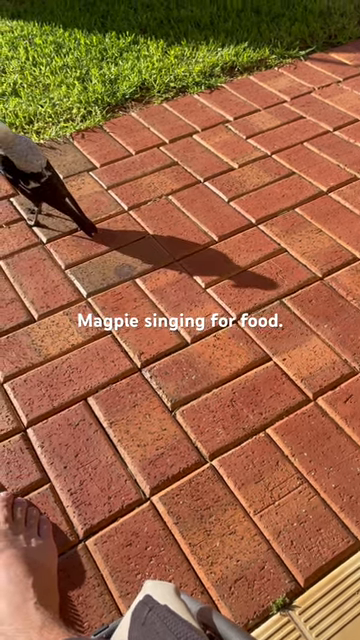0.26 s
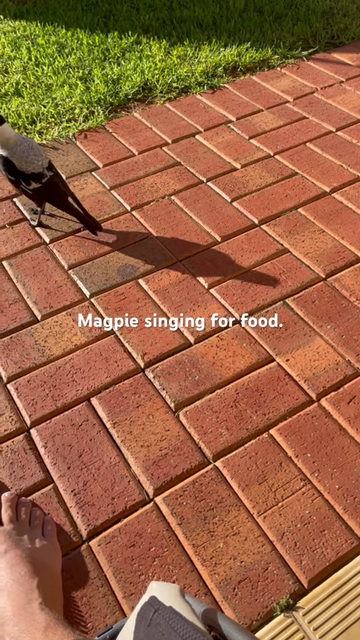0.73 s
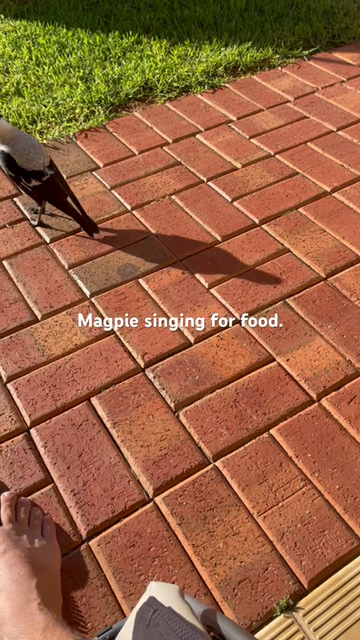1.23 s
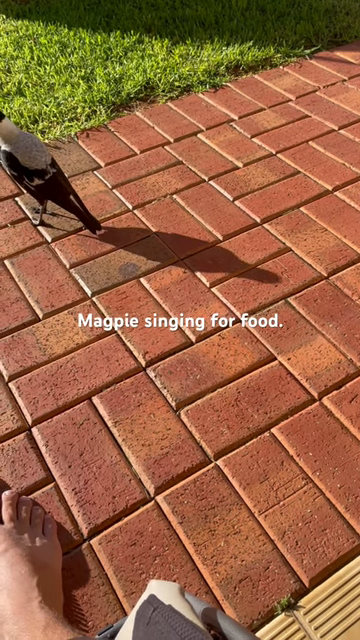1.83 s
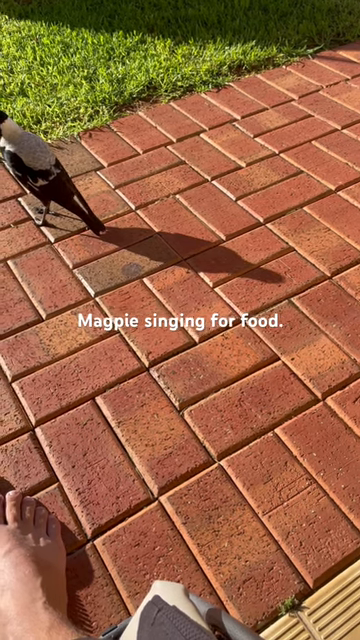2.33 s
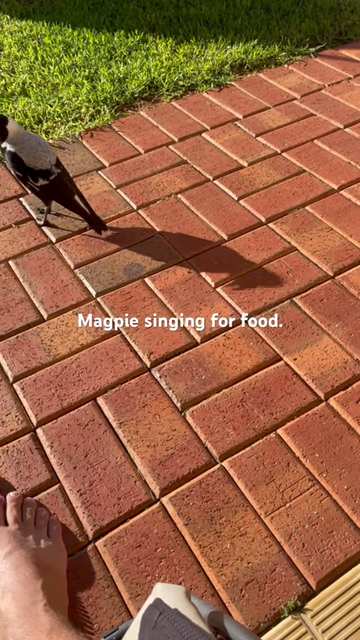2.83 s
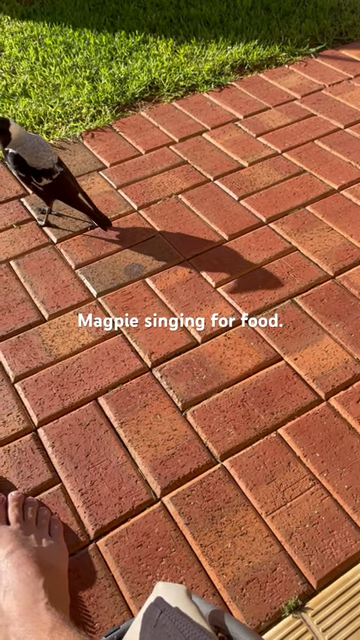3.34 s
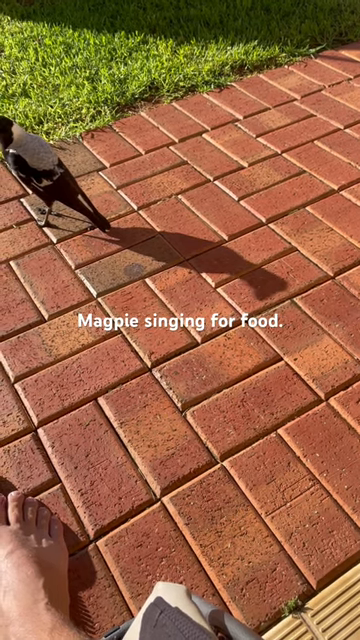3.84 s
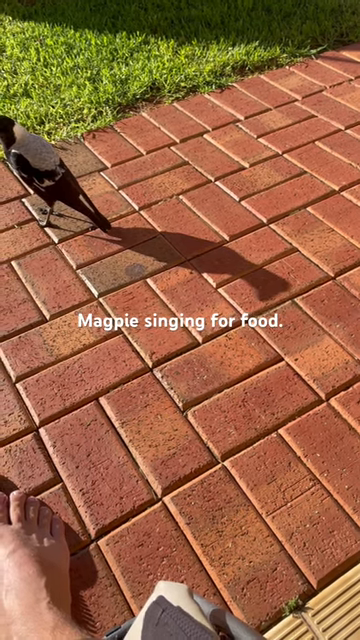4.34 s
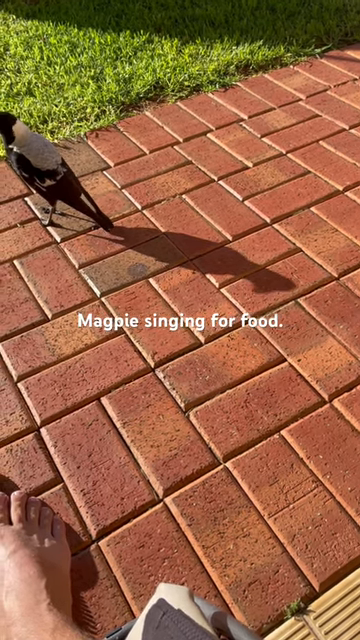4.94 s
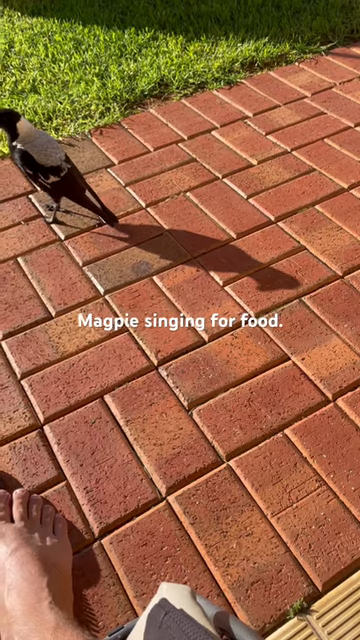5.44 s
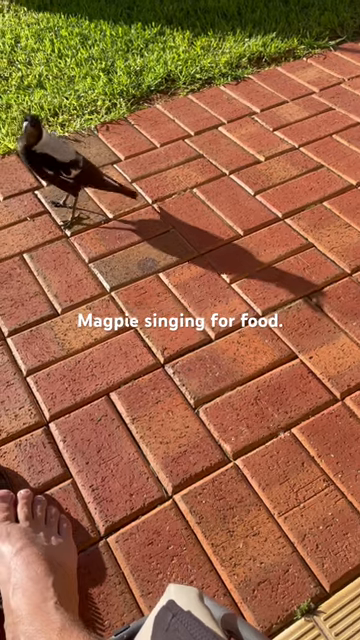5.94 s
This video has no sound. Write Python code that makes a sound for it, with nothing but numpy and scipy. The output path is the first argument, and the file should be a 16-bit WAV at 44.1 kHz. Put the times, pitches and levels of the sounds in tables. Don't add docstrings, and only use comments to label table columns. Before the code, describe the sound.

Outdoors on a paved yard, a magpie near a handheld phone opens with quick fluted notes and throbbing warbles, pauses for small squeaks and soft knocks on the phone, gives a brief harsh rising call, then sings a longer run of clear whistles and warbles that fades out. A faint motor hum, distant traffic and slight cloth rustle lie beneath, with short echoes from walls.

```python
import sys
import numpy as np
from scipy import signal
from scipy.fft import rfft, irfft, next_fast_len
from scipy.io import wavfile
from scipy.ndimage import uniform_filter1d, map_coordinates

SR = 44100
rng = np.random.default_rng(int(sys.argv[2]) if len(sys.argv) > 2 else 0)


def dump(signal):
    limited = np.clip(np.atleast_2d(signal).T, -1, 1)
    pcm = np.round(limited * 32767).astype(np.int16)
    wavfile.write(sys.argv[1], SR, pcm)


def to_linear_factor(level_db):
    exponent = np.asarray(level_db, float) / 20
    return 10 ** exponent


N = 272538

# t/s, level/dB
TRAFFIC = [(0.0, -60.5), (0.4, -63.5), (6.18, -68.5)]
# f/Hz, level per Hz/dB
MURMUR = [(20, -33.5), (45, 0.5), (82, -2), (125, -10), (400, -19), (950, -22), (1700, -30.5), (2900, -43),
          (6000, -56.5), (15500, -56.5)]
# f/Hz, likeness/0-1
ALIKE = [(60, 0.99), (150, 1), (400, 0.14), (6000, 0.2)]
# start t/s, length/s, peak level/dB
RUSTLE = [
    (-.1, 0.49, -82.5),
    (.8, 0.21, -86.5),
    (1.3, 0.48, -76.5),
    (1.78, .14, -77),
    (1.92, 0.47, -71),
    (2.76, 0.6, -75),
    (5.93, 0.5, -99.5),
]
# share of its length/0-1, level/dB
RUSTLE_SHAPE = [(0, -15.5), (.28, -0.5), (.6, -2), (1, -22.5)]
STILL_DB = -98.5
# f/Hz, level per Hz/dB
CLOTH = [(500, -11), (1200, -2.5), (2800, 0.5), (4300, 2.5), (5500, 3.5), (6500, -4), (9000, -11.5),
         (13000, -18), (15500, -11.5)]
# t/s, shaft f/Hz, shaft level/dB, second order level/dB, mains level/dB
MOTOR = [(0, 83.37, -51.5, -55.5, -60), (2, 82.82, -58.5, -62, -61), (4, 82.17, -61.5, -66, -58.5),
         (6.18, 82.07, -62.5, -65, -60)]
# t/s, firing f/Hz, level/dB
ENGINE = [(2, 42.11, -88), (3.2, 50, -62), (4, 60, -60.5), (5, 64, -54), (5.6, 69.05, -64),
          (6.18, 79.4, -60)]

# f/Hz, level/dB
THROAT = [(1200, 21), (1800, -6), (2600, -8), (3100, -13), (3700, -10), (4800, -16.5), (6000, -32.5),
          (9000, -40.5), (12000, -39), (14000, -39.5)]
# start t/s, length/s, first f/Hz, last f/Hz, peak level/dB
SWELLS = [(.05, .07, 914, 1020, -48), (.34, .046, 800, 1127, -41.5), (1.153, 0.028, 874, 1240, -24.5),
          (1.35, .04, 720, 844, -36), (3.0, .05, 1330, 1290, -25), (3.04, .028, 1250, 1130, -30),
          (3.33, .022, 886, 1484, -35), (3.712, 0.047, 1380, 1409, -28.5), (3.97, .03, 978, 798, -33.5),
          (4.115, .02, 1162, 1339, -34), (4.66, .044, 1164, 1202, -21), (4.935, .055, 787, 806, -39.5),
          (5.472, .018, 1148, 1302, -37.5)]
# start t/s, length/s, first f/Hz, last f/Hz, peak level/dB
HELD = [(0, 0.043, 856, 889, -37.5), (.172, .043, 1205, 1119, -40), (.93, 0.023, 1249, 1321, -23),
        (1.17, 0.099, 937.6, 1045, -27), (1.185, 0.07, 1208, 1116, -22.5), (1.27, 0.046, 971, 1102, -35.5),
        (1.54, 0.024, 3580, 3190, -55), (3.445, 0.038, 1044, 1203, -47.5), (4.83, .085, 778, 798, -40.5)]
# start t/s, length/s, first f/Hz, last f/Hz, peak level/dB
FLUTES = [(3.04, .085, 1048, 1033, -25), (5.022, .075, 1377, 1414, -33)]
# start t/s, length/s, first f/Hz, last f/Hz, peak
# level/dB
BUILDS = [(3.348, .154, 1432, 1358, -24), (3.76, .088, 1007, 1006, -23.5), (4.325, .07, 995, 1035, -25.5),
          (5.088, 0.056, 1425, 1277, -30)]
# start t/s, length/s, first f/Hz, last f/Hz, peak level/dB
FADES = [(.214, 0.029, 956, 894, -36), (3.68, 0.037, 1232, 1417, -17), (3.842, .102, 1010, 984, -33.5),
         (4.7, 0.022, 1361, 1374, -32.5)]
# start t/s, length/s, edge f/Hz, middle f/Hz, peak level/dB
ARCHES = [(.703, .045, 1260, 1325, -28), (4.138, .04, 1500, 2780, -51), (3.8, .09, 830, 1220, -49),
          (4.995, .03, 1300, 942, -29), (5.44, .034, 1300, 1715, -47)]

# start t/s, length/s, f/Hz, peak level/dB, throb rate/Hz
RISING = [(4.185, .14, 929.7, -25, 92)]
EVEN = [(1.305, .185, 750, -42.5, 87.4), (4.825, .055, 934.7, -20.5, 123.2)]
ROLLING = [(5.138, .222, 940, -29, 59.42)]
OPENING = [(0, .175, 1195, -27.5, 140)]
QUAVERS = [(.89, .04, 1179, -21, 77.8), (5.36, .082, 1250, -25, 98.9)]
BURBLE = [(.735, .16, 897, -32.5, 60.8)]
SINKING = [(.235, 0.12, 885, -42.5, 70), (.38, 0.078, 1049, -38.5, 69), (.935, .065, 984, -24, 48),
           (1.0, 0.13, 860.4, -40, 76), (4.0, .115, 880, -41, 92), (4.4, .075, 1086, -26, 44),
           (4.7, .06, 985, -25, 54), (5.49, 0.1, 956, -35, 47.5)]
MUTTERS = [(.45, .11, 962, -58.5, 81), (4.475, 0.093, 960, -45, 86.2), (4.76, 0.053, 879, -42.5, 81.1),
           (5.6, .16, 792, -55, 57.8)]

# share of its length/0-1, level against the peak/dB
SWELL_SHAPE = [(0, -15), (.35, -6.5), (.75, 1.5), (1.002, -8)]
HELD_SHAPE = [(0, -3), (.2, -0.5), (.8, -2), (1, -10)]
FLUTE_SHAPE = [(0, -2), (0.251, -2), (.88, -1), (0.998, -8.5)]
BUILD_SHAPE = [(0, -14), (.25, -6), (.5, -2), (0.851, 0), (1, -7)]
FADE_SHAPE = [(0, -3), (.2, -0.5), (0.502, -3), (1, -18)]
RISING_SHAPE = [(0, -10.5), (.5, -3.5), (.8, -1), (1, -3)]
EVEN_SHAPE = [(0, -12), (.35, -1.5), (.7, -0.5), (1, -9)]
ROLLING_SHAPE = [(0, -12), (.35, -0.5), (.8, -0.5), (1, -8)]
SINKING_SHAPE = [(0, -0.5), (0.152, 0), (0.499, -5.5), (1, -10)]

# t/s, f/Hz, level/dB
SQUEAKS = [
    [(0.665, 492, -68.5), (0.675, 519.5, -78), (0.681, 804, -60), (0.699, 1282, -72.5)],
    [(1.82, 1904, -66.5), (1.838, 2034, -42), (1.854, 2134, -44.5), (1.88, 3386, -81)],
    [(2.275, 756, -60), (2.325, 1030, -50.5), (2.34, 1241, -44.5), (2.355, 1187, -47), (2.395, 1320, -48),
     (2.409, 1500, -66)],
    [(2.5, 1286, -47.5), (2.518, 1165, -43), (2.535, 1346, -50.5), (2.558, 2798, -46), (2.57, 2510, -61),
     (2.574, 1787, -46.5), (2.594, 915, -51)],
    [(2.635, 1153, -66), (2.653, 1343, -47.5), (2.661, 1271, -45.5), (2.675, 936, -51)],
    [(4.135, 654, -66.5), (4.151, 1248, -37), (4.159, 1372, -33.5), (4.173, 1177, -36.5),
     (4.185, 1008, -56.5)],
]
SQUEAK_OVER = [8, -22.5, 0.5, 3, -12, -26.5]
# t/s, f/Hz, level/dB
HARSH = [(2.77, 1398, -55), (2.79, 1879, -44), (2.814, 2207, -41), (2.912, 2098, -40.5),
         (2.94, 1937, -36.5)]
# t/s, f/Hz, level/dB
HARSH_END = [(2.94, 1865, -42), (2.974, 1701, -43.5), (3.0, 1796, -45)]
# t/s, f/Hz, level/dB
BUZZ = [(3.5, 1230, -33.5), (3.6, 1161, -37.5), (3.65, 1106, -32.5), (3.685, 1186, -26.5)]
# t/s, f/Hz, level/dB
UNDER = [(2.775, 1000, -80), (2.81, 1240, -72), (2.88, 1270, -71), (2.925, 1350, -71), (2.94, 1270, -67),
         (2.975, 1050, -78)]

RISING_THROB, EVEN_THROB, SINKING_THROB = (0.36, .075, 1.2), (0.086, .08, 1.8), (.25, .08, 1.7)
MUTTER_THROB, ROLLING_THROB, QUAVER_THROB = (0.47, 0.21, -2.3), (0.37, .09, 1.2), (0.094, .015, -2.2)
# reference time that sets the throbs' phase t/s, rate/Hz, depth, pitch swing, swing
HARSH_THROB, END_THROB = (2, 89.5, .28, .09, -1.5), (4, 56, 1, -0.05, -6.5)
BUZZ_THROB, UNDER_THROB = (3.5087, 87, .5, 0.07, -2.5), (2.7785, 89.5, .4, .025, -2)
STEADY = (0, 0, 0, 0, 0)
THROB_DELAY_S = .006
PITCH_PER_DB, SAG_PER_DB = .008, .014
OVER_DB, WARBLE_OVER_DB, QUAVER_OVER_DB, MUTTER_OVER_DB = -27.5, -30.5, -34, -10.5
HARSH_OVER_DB, END_OVER_DB, BUZZ_OVER_DB, UNDER_OVER_DB = -12, -0.5, -27, 29
OVER_PER_DB, WARBLE_OVER_PER_DB, OVER_PER_S = 0.69, 0.98, -49.5
ROUGH = dict(flute=.16, quaver=.27, rising=.45, even=.33, rolling=.38, sinking=.45, mutter=.55, harsh=.5)

# f/Hz, time to fall 60 dB/s
YARD = [(300, 1), (1000, 0.46), (2500, 0.63), (6000, 0.42)]
# f/Hz, left minus right level/dB, left lead/rad
PORTS = [(1400, 0.2, -0.19), (2220, 0, 1.1), (3020, -6.5, 1.8), (3400, -0.5, 2.3), (5260, -1.5, -0.16)]
# t/s, peak level/dB, f/Hz
BUMPS = [
    (0.035, -47, 365),
    (0.656, -52.5, 458),
    (1.452, -54, 242),
    (1.672, -49.5, 444),
    (1.807, -52, 406),
    (2.047, -43, 382),
    (2.092, -48, 378.3),
    (2.495, -48.5, 600),
    (3.357, -59.5, 248),
]
# t/s, peak level/dB, body level/dB
TICKS = [
    (.668, -65, 12.5),
    (1.808, -63, 8.5),
    (2.4998, -59, 35),
    (5.884, -65.5, -7),
    (6.128, -67, 11.5),
]
# low f/Hz, high f/Hz
HOLES = [(6750, 8350), (13100, 15050)]


def unit(x):
    return x / np.sqrt(np.mean(x ** 2) + 1e-20)


def along(points, hz):
    f, value = np.transpose(points)
    return np.interp(np.log(hz + 1), np.log(f + 1), value)


def curves(rows, t):
    s, *columns = np.transpose(rows)
    return [np.interp(t, s, column) for column in columns]


def wobble(rate, count):
    return map_coordinates(rng.standard_normal(count // 40 + 9), [np.arange(count) * rate / SR])


def filtered(x, response):
    m = next_fast_len(N + 8192)
    return irfft(rfft(x, m) * response(np.fft.rfftfreq(m, 1 / SR)), m)[..., :N]


def add(track, s, x):
    part = track[..., max(round(s * SR), 0):][..., :x.shape[-1]]
    part += x[..., :part.shape[-1]]


def rush(spectrum, alike):
    def shape(hz):
        turn = np.arccos(np.clip(along(alike, hz), -1, 1)) / 2
        return to_linear_factor(along(spectrum, hz)) * [np.cos(turn), np.sin(turn)]

    mid, side = filtered(rng.standard_normal((2, N)), shape)
    return unit(np.array([mid + side, mid - side]))


def background():
    t = np.arange(N) / SR
    traffic_db = curves(TRAFFIC, t)[0] + 7 + 2.4 * wobble(9.9, count=N)
    traffic = to_linear_factor(traffic_db) * rush(MURMUR, ALIKE)
    grain = unit(to_linear_factor(1.2 * wobble(300, count=N) + 1.2 * wobble(25, count=N)))
    strength = to_linear_factor(STILL_DB)
    for s, length, db in RUSTLE:
        moving = abs(t - s - length / 2) < length / 2
        strength = strength + to_linear_factor(db + curves(RUSTLE_SHAPE, (t - s) / length)[0]) * moving
    hiss = rush(CLOTH, [(1000, 1.0), (3000, 0.15), (12000, 0.15)])
    return traffic + to_linear_factor(14) * strength * grain * hiss


def hum():
    t = np.arange(N) / SR
    shaft, first_db, second_db, mains_db = curves(MOTOR, t)
    firing, engine_db = curves(ENGINE, t)

    def tone(hz, db, drift):
        level = to_linear_factor(db + 0.5 + drift * wobble(14, count=N))
        return level * np.sin(2 * np.pi * np.cumsum(hz) / SR + 0.2 * drift * wobble(8.3, count=N))

    motor = tone(shaft, first_db, drift=1.2) + tone(2 * shaft, second_db, drift=0.39)
    mains = tone(50.5 + 0 * t, mains_db, drift=1.5)
    return motor + mains + tone(firing, engine_db, drift=1.6)


def phrase(s, length, db, shape, pitch):
    u = np.linspace(0, 1, num=17)
    effort, = curves(shape, u)
    return np.transpose([s + length * u, pitch(u, effort), db + effort])


def choke(tone):
    loud = tone / .1
    return to_linear_factor(-58) * loud ** 2 + to_linear_factor(-49) * loud ** 3 + to_linear_factor(-53) * loud ** 4


def note(rows, voice, throb):
    t = np.arange(rows[0][0], rows[-1][0], 1 / SR)
    pitch, level = curves([(s, hz, to_linear_factor(db)) for s, hz, db in rows], t)
    over_db, rough = voice
    first, rate, depth, swing, lead = throb

    def shake(speed):
        return wobble(speed, count=len(t))

    turn = 2 * np.pi * rate * (t - first) + 1.4 * rough * shake(35)
    spike = np.exp(1.6 * (np.cos(turn + lead) - 1)) - .25
    pitch = pitch * (1 + 2.72 * swing * spike + 0.085 * rough * shake(300))
    pulse = unit(to_linear_factor(11 * depth * np.cos(turn) + 4 * rough * shake(160)))
    phase = 2 * np.pi * np.cumsum(pitch) / SR
    k = np.arange(2, 13)[:, None]
    flicker = to_linear_factor((0.5 + 9.5 * rough) * np.array([shake(215.1) for _ in k]))
    share = to_linear_factor(along(THROAT, k * pitch)) * (k * pitch < SR / 3) * flicker
    to_edge = np.minimum(t - t[0], t[-1] - t)
    edge = np.sin(np.pi / 2 * np.clip(to_edge / .0055, 0, 1)) ** 2
    swell = np.sqrt(2) * level * edge * pulse
    bright = to_linear_factor(over_db) * (level / level.max()) ** 0.2
    bright = bright * to_linear_factor(-18 * np.clip(swing, 0, .3) ** .5 * spike)
    tone = np.sin(phase) + bright * np.sum(share * np.sin(k * phase), 0)
    air = bright * (0.35 + 0.9 * rough) * rng.standard_normal(len(t))
    return swell * np.array([tone, air])


def magpie():
    song = np.zeros((3, N))

    def sing(rows, over_db, kind, throb):
        tone, air = note(rows, (over_db, ROUGH[kind]), throb)
        add(song, rows[0][0], np.array([tone, air, choke(tone)]))

    def line(u):
        return u

    def bow(u):
        return np.sin(np.pi * u)

    clear = [(SWELLS, SWELL_SHAPE, line), (HELD, HELD_SHAPE, line), (FLUTES, FLUTE_SHAPE, line),
             (BUILDS, BUILD_SHAPE, line), (FADES, FADE_SHAPE, line), (ARCHES, HELD_SHAPE, bow)]
    for notes, shape, bend in clear:
        for s, length, a, b, db in notes:
            rows = phrase(s, length, db, shape, lambda u, _: a + (b - a) * bend(u))
            over_db = OVER_DB + OVER_PER_DB * (db + 28) + OVER_PER_S * length
            sing(rows, over_db, "flute", STEADY)

    warbles = [(RISING, RISING_SHAPE, RISING_THROB, WARBLE_OVER_DB, "rising"),
               (EVEN, EVEN_SHAPE, EVEN_THROB, WARBLE_OVER_DB, "even"),
               (ROLLING, ROLLING_SHAPE, ROLLING_THROB, WARBLE_OVER_DB, "rolling"),
               (OPENING, FLUTE_SHAPE, QUAVER_THROB, QUAVER_OVER_DB, "quaver"),
               (QUAVERS, BUILD_SHAPE, QUAVER_THROB, QUAVER_OVER_DB, "quaver"),
               (BURBLE, HELD_SHAPE, ROLLING_THROB, WARBLE_OVER_DB, "rolling"),
               (SINKING, SINKING_SHAPE, SINKING_THROB, WARBLE_OVER_DB, "sinking"),
               (MUTTERS, SINKING_SHAPE, MUTTER_THROB, MUTTER_OVER_DB, "mutter")]
    for notes, shape, throb, over_db, kind in warbles:
        follow = SAG_PER_DB if kind == "sinking" else PITCH_PER_DB
        for s, length, hz, db, rate in notes:
            rows = phrase(s, length, db, shape, lambda u, effort: hz * (1 + follow * effort))
            richness_db = over_db + WARBLE_OVER_PER_DB * (db + 29.5)
            sing(rows, richness_db, kind, (s + THROB_DELAY_S, rate, *throb))

    for rows, over_db in zip(SQUEAKS, SQUEAK_OVER):
        sing(rows, over_db, "flute", STEADY)
    sing(HARSH, HARSH_OVER_DB, "harsh", HARSH_THROB)
    sing(HARSH_END, END_OVER_DB, "harsh", END_THROB)
    sing(BUZZ, BUZZ_OVER_DB, "rising", BUZZ_THROB)
    sing(UNDER, UNDER_OVER_DB, "flute", UNDER_THROB)

    tone, air, own = song
    mixed = choke(tone) - 0.6 * own
    return tone + filtered(air + mixed, lambda hz: to_linear_factor(along(THROAT, hz) + 6) * (hz > 1600))


def yard(x):
    hz, t, z = signal.stft(rng.standard_normal((2, SR)), SR, nperseg=256)
    decay = to_linear_factor(-60 * t / along(YARD, hz)[:, None])
    mid, side = signal.istft(z * decay, SR, nperseg=256)[1]
    tail = np.array([mid + .35 * side, mid - .35 * side])
    late = np.pad(x, (500, 0))[None]
    return signal.fftconvolve(late, tail / np.linalg.norm(tail[0]), axes=1)[:, :N]


def handling():
    out, t = np.zeros(N), np.arange(SR // 8) / SR
    age = t / 0.05 * 4
    for s, db, hz in BUMPS:
        b, a = signal.butter(2, [hz * 0.51, hz * 1.7], "band", fs=SR)
        puff = unit(signal.lfilter(b, a, rng.standard_normal(len(t))))
        add(out, s, to_linear_factor(db - 4.5) * puff * age * np.exp(1 - age))
    for s, db, body_db in TICKS:
        crack = rng.standard_normal(len(t)) * to_linear_factor(-60 * t / .009)
        body = uniform_filter1d(crack, size=31) - uniform_filter1d(crack, size=91)
        add(out, s, to_linear_factor(db) * np.gradient(crack) + to_linear_factor(db + body_db) * body)
    return out


def scene():
    around = background() + hum()
    bird = magpie()
    hz, tilt_db, lead = np.transpose(PORTS)

    def port(f):
        left_over_right = to_linear_factor(np.interp(f, hz, tilt_db)) * np.exp(1j * np.interp(f, hz, lead))
        return left_over_right ** np.array([[.5], [-.5]])

    return around + filtered(bird, port) + to_linear_factor(-11.5) * yard(bird) + handling()


def band_limit(x):
    return signal.sosfilt(signal.butter(12, 15760, fs=SR, output="sos"), x)


def record(dry):
    dry = filtered(dry, lambda hz: hz ** 4 / (hz ** 4 + 32.0 ** 4))
    mid, side = (dry[0] + dry[1]) / 2, (dry[0] - dry[1]) / 2
    mid = filtered(mid, lambda hz: np.prod([(hz < lo) | (hz > hi) for lo, hi in HOLES], 0))
    return band_limit(np.array([mid + side, mid - side]))


dry = scene()
out = record(dry)
dump(out)
```